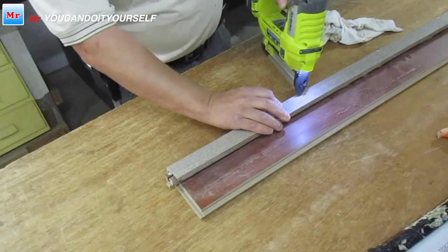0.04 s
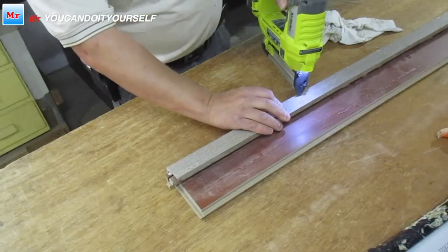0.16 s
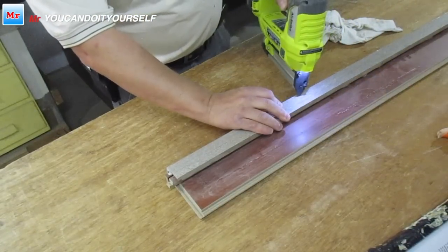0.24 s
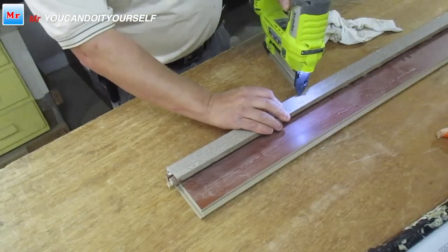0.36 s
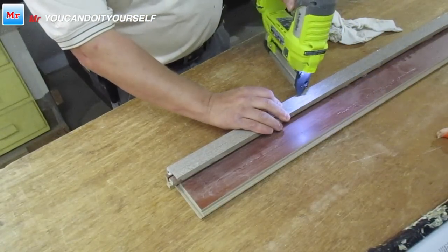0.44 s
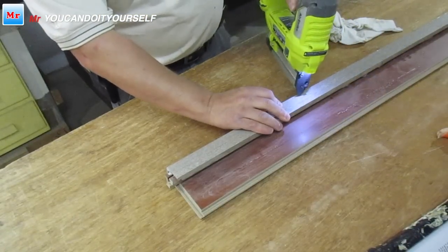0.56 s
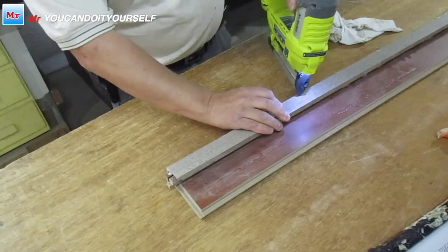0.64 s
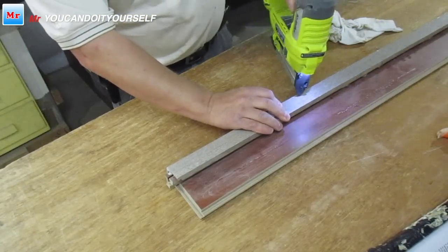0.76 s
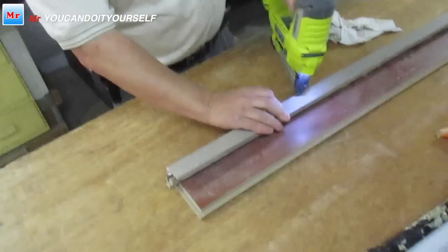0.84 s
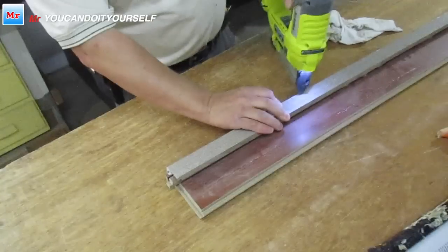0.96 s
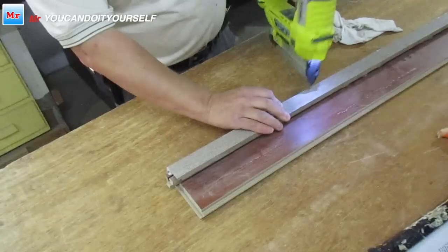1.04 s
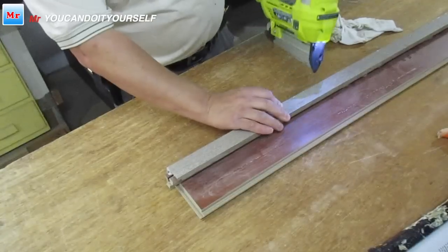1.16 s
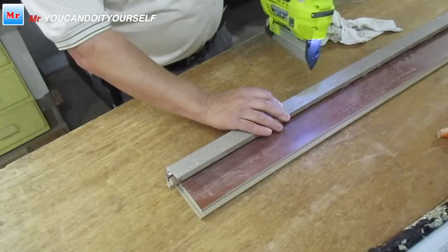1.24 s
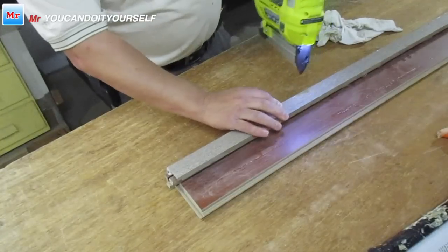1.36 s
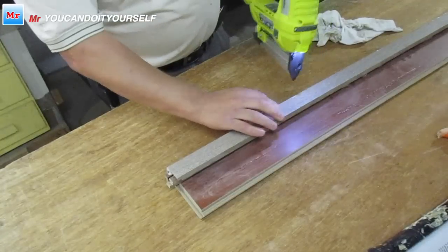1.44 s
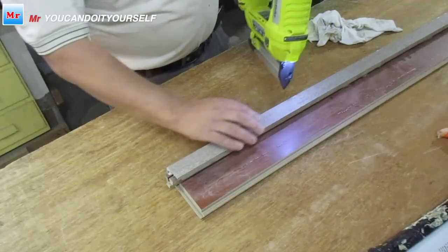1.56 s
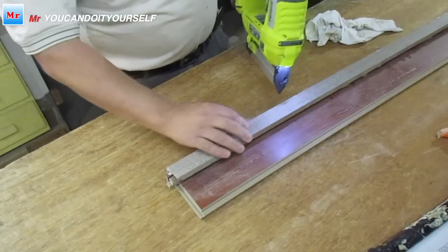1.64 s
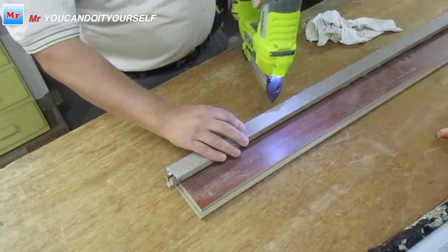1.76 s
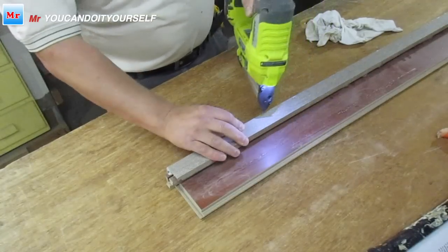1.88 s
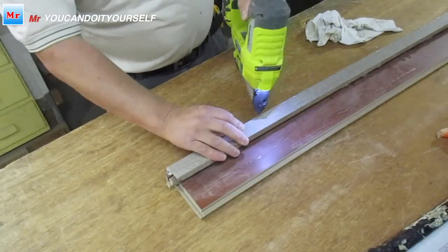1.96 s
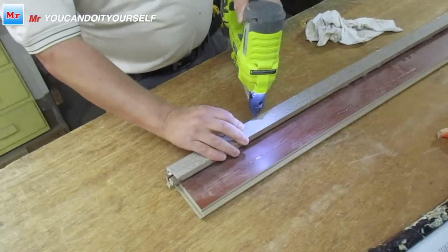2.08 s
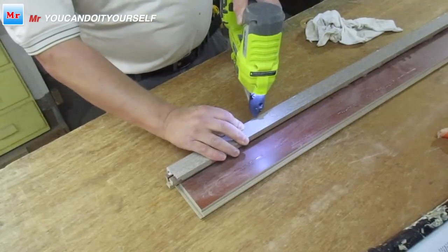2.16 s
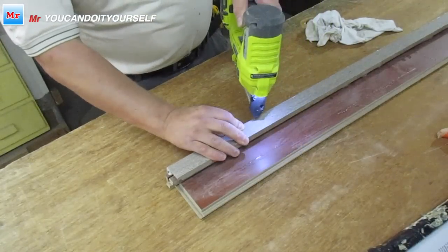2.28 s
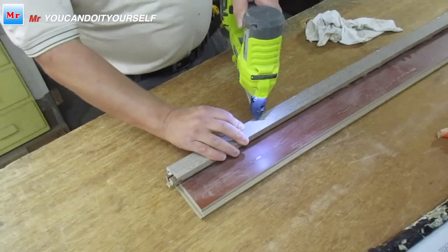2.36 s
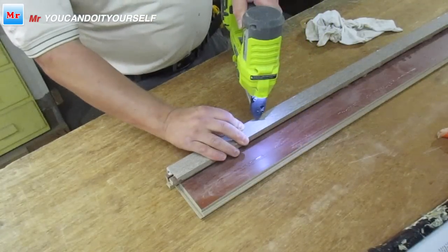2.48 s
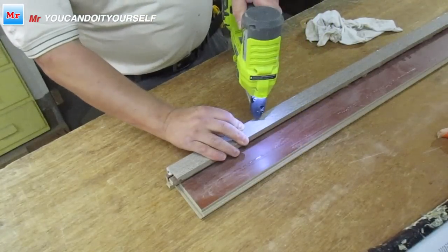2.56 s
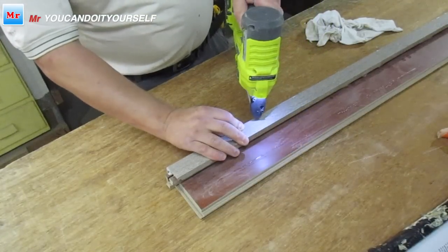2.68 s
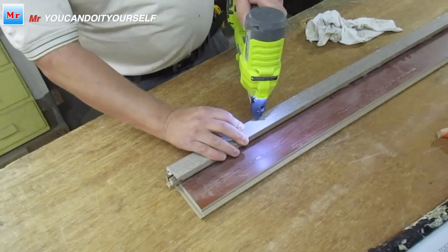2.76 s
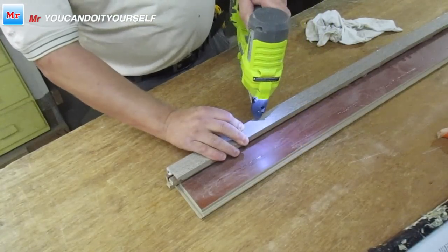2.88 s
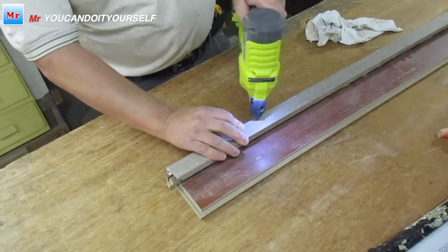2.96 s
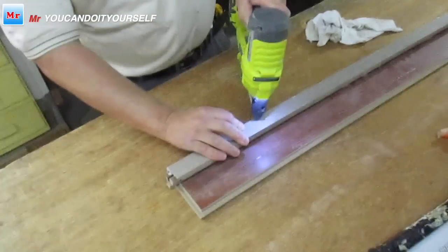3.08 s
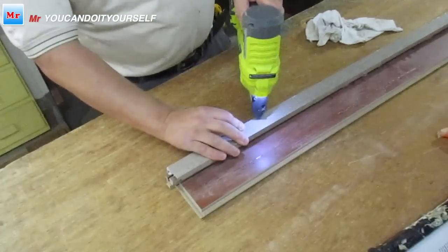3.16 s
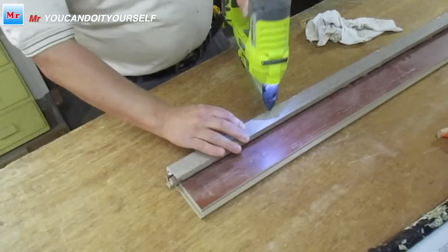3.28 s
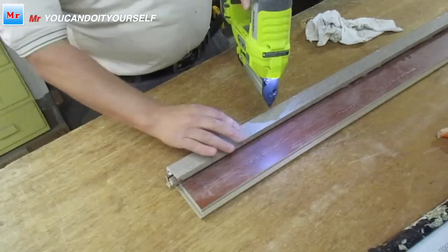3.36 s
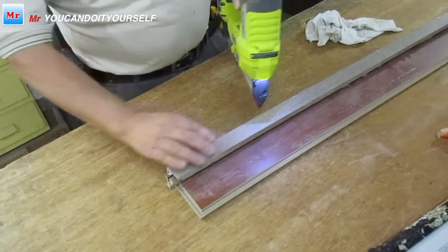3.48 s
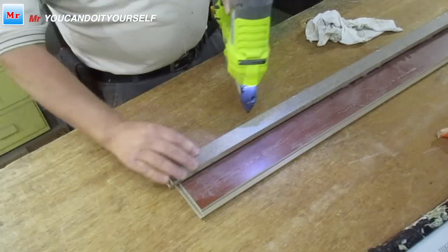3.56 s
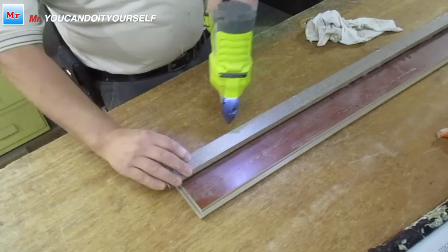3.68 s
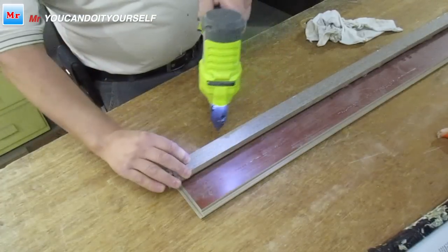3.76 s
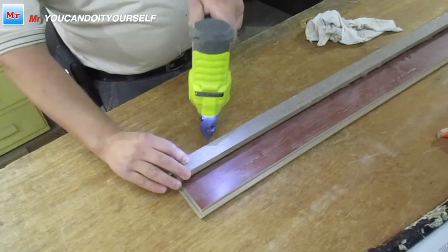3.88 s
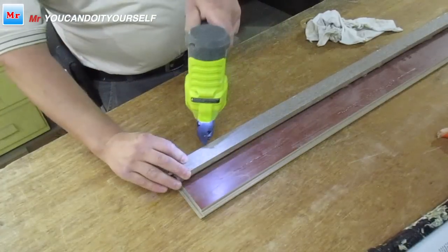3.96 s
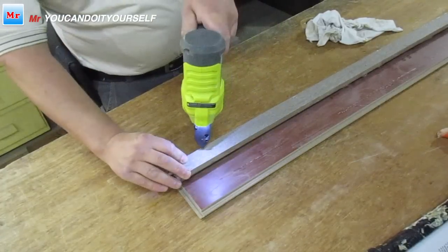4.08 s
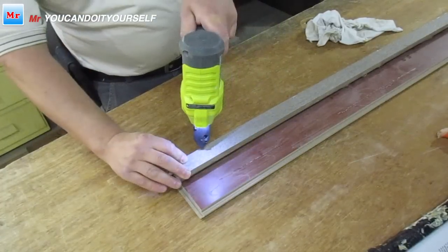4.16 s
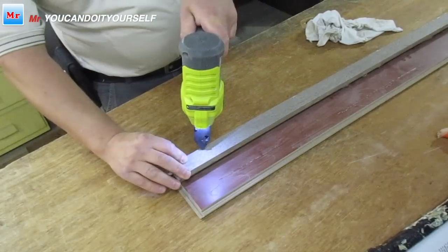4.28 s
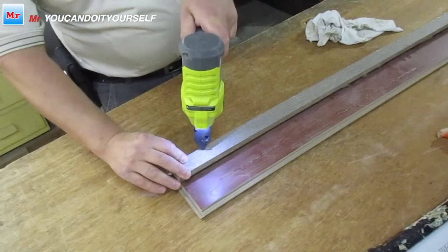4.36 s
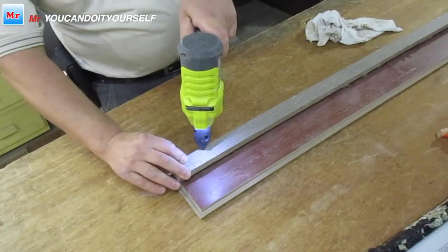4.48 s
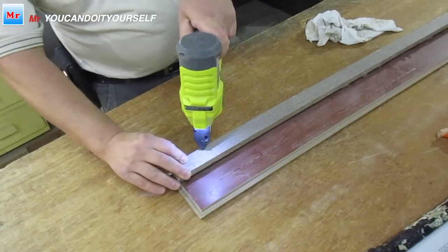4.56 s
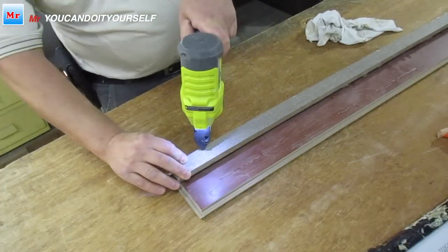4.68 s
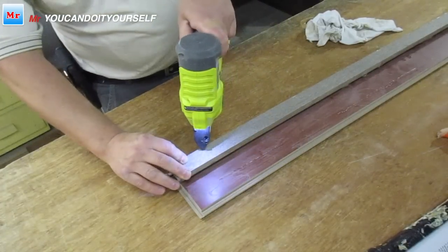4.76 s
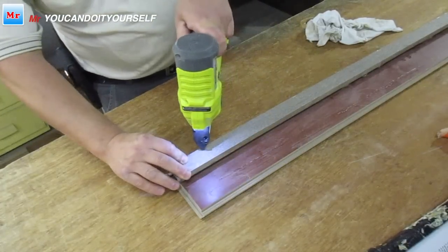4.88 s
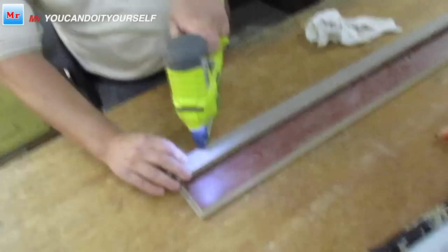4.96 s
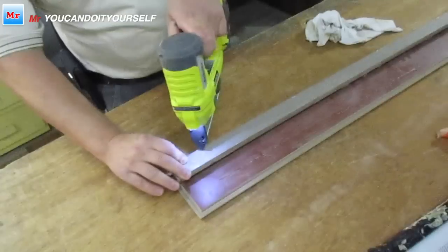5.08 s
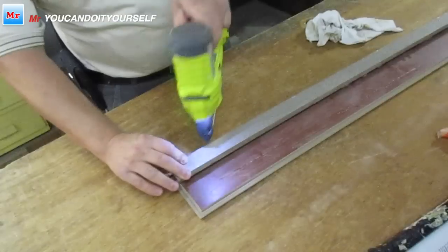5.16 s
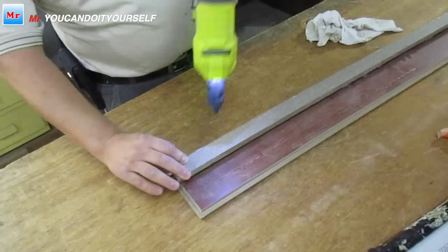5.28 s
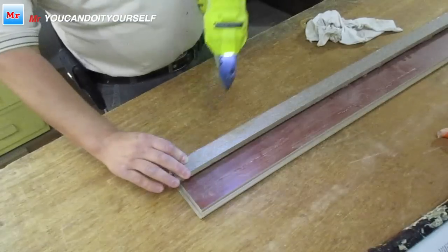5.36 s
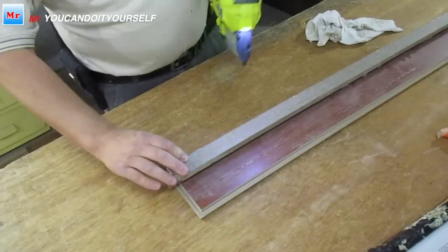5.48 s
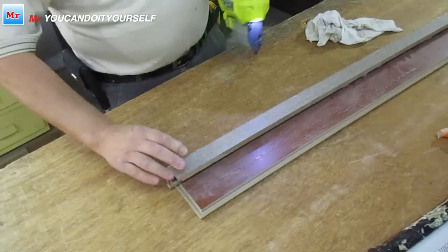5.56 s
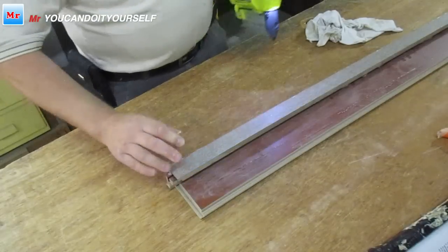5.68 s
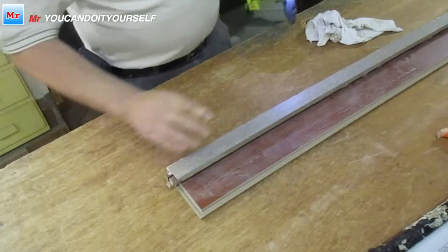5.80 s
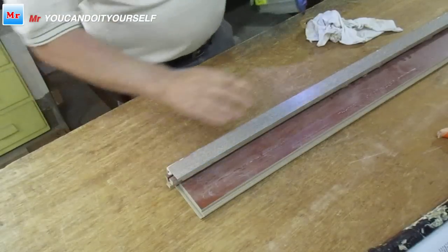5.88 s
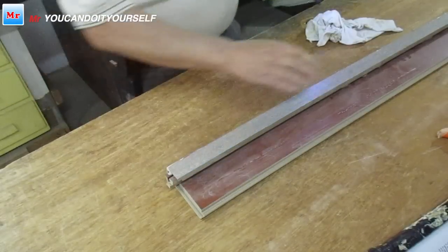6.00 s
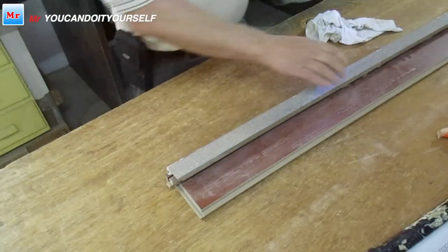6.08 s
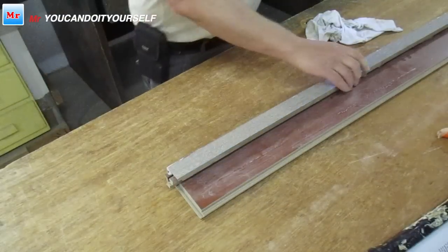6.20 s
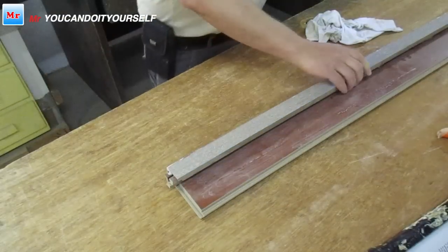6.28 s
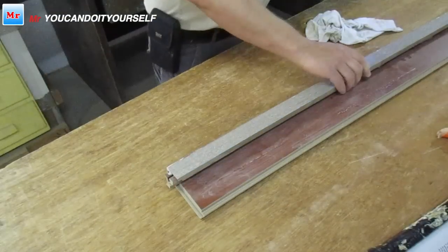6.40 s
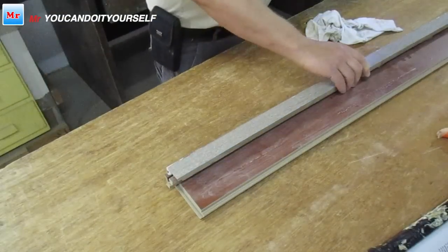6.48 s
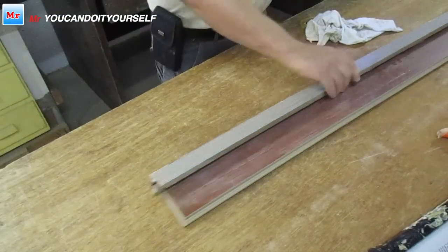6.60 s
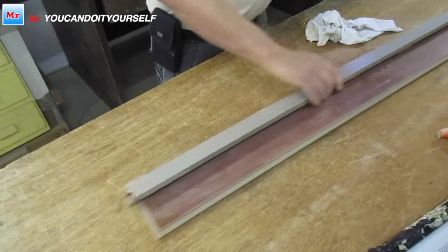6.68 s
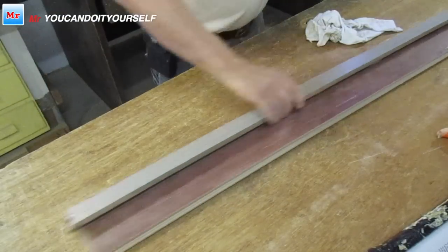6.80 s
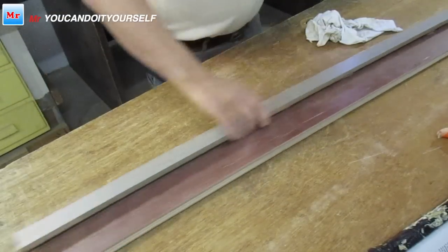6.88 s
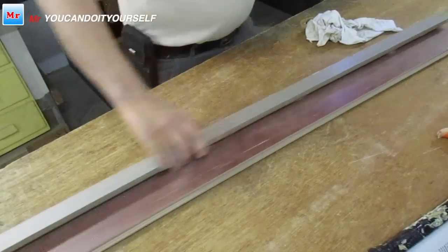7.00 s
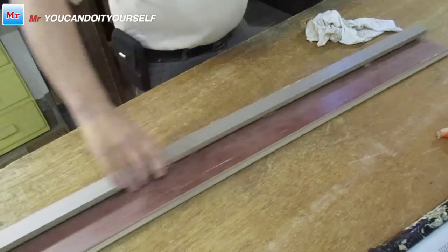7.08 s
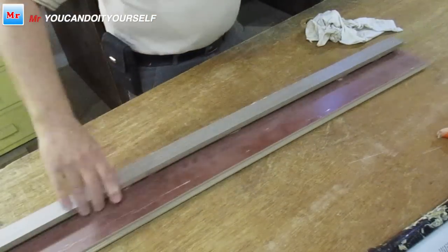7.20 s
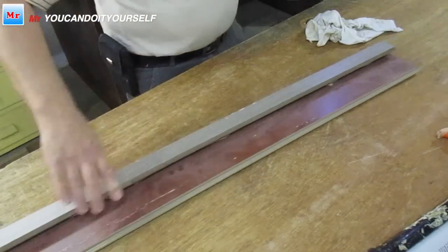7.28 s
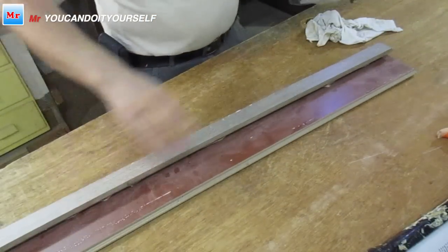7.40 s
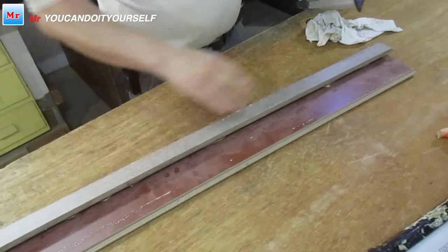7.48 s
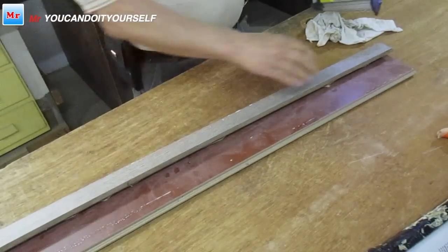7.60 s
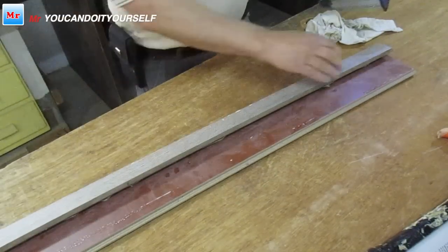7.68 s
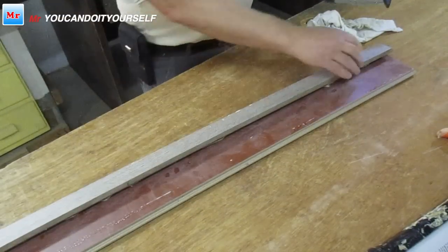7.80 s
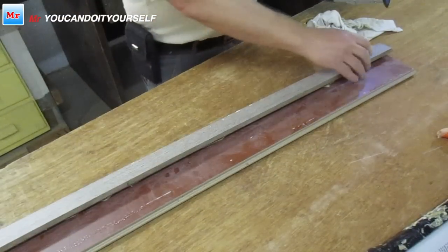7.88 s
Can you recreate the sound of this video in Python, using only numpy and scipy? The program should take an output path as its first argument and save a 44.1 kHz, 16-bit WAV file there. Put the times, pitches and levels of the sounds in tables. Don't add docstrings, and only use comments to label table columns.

```python
import sys
import numpy as np
from scipy import signal
from scipy.fft import rfft, irfft
from scipy.io import wavfile

SR = 44100
rng = np.random.default_rng(int(sys.argv[2]) if len(sys.argv) > 2 else 0)


def wrap_up_sound(samples):
    columns = np.atleast_2d(samples).T
    tamed = np.clip(columns, -1, 1)
    steps = np.round(tamed * 32767).astype(np.int16)
    wavfile.write(sys.argv[1], SR, steps)


def gain_from_decibels(decibels):
    exponent = np.asarray(decibels, float) / 20
    return 10 ** exponent


N = 350154
T = np.arange(N) / SR

# (time [s], thump [dB], pin home [dB], bumper [dB], hall [dB])
BLOWS = [
    (0.8542, -6, -5.5, -5, -12),
    (3.045, -6.5, -1, -9, -13),
    (5.021, -8, -1.5, -3.5, -11.5),
]


def unit(x):
    return x / np.sqrt(np.mean(x ** 2))


def colour(x, table):
    hz, db = np.transpose(table)
    f = np.arange(len(x) // 2 + 1) * SR / len(x) + 1
    gain = gain_from_decibels(np.interp(np.log(f), np.log(hz), db))
    return irfft(rfft(x) * gain, len(x))


def ring(x, hz, width):
    b, a = signal.iirpeak(min(hz, SR / 2.2), hz / width, fs=SR)
    return signal.lfilter(b, a, x)


def body(x, modes):
    out = 0
    for k, (hz, width, db) in enumerate(modes):
        once = ring(x, hz, 1.8 * width)
        out = out + (-1) ** k * gain_from_decibels(db) * ring(once, hz, 1.8 * width)
    return unit(out)


def glide(x, s, hz, width):
    phase = 2 * np.pi * np.cumsum(np.interp(T, s, hz)) / SR
    low_pass = signal.butter(2, width / 2, fs=SR, output="sos")
    slow = signal.sosfilt(low_pass, [x * np.cos(phase), x * np.sin(phase)])
    return unit(slow[0] * np.cos(phase) + slow[1] * np.sin(phase))


def grains(rate, spread_db):
    hit = rng.random(N) < rate / SR
    size_db = spread_db * np.minimum(rng.exponential(size=N), 3.5)
    return hit * rng.standard_normal(N) * gain_from_decibels(size_db)


def ping(db, hz, t60):
    t = T[:4096]
    return gain_from_decibels(db) * np.sin(2 * np.pi * hz * t) * 1000 ** (-t / t60)


def add(track, s, x):
    i = int(s * SR)
    track[i:i + len(x)] += x[:N - i]


def room_tone():
    # (frequency [Hz], density [dB per Hz])
    air_tone = [(15, -46), (25, -4.5), (86, -5.5), (140, -7), (252, -18), (358, -12), (409, -17),
                (565, -15), (646, -24), (719, -11.5), (1490, -16), (1610, -13.5), (2110, -22.5),
                (14200, -42), (15400, -47)]
    # (frequency [Hz], level [dB])
    fan_lines = [(134.6, -71), (721, -73.5), (1615, -73.5)]
    # (frequency [Hz], rms level [dB])
    scan_tone = [(15700, -88)]
    # (time [s], level [dB])
    gain_dips = [
        (0., -1.),
        (.86, -16),
        (3.05, -22),
        (5.03, -13),
        (7., -4),
    ]
    air_db, recovery_s = -53, 1.3
    air = unit(colour(rng.standard_normal(N), air_tone))
    air = air + 0.49 * ring(air, 8500, 3500)
    lines = sum(gain_from_decibels(db + 55.5) * unit(ring(rng.standard_normal(N), hz, 6.7)) for hz, db in fan_lines)
    scan = sum(gain_from_decibels(db + 63) * np.sin(2 * np.pi * hz * T) for hz, db in scan_tone)
    dip_db = sum(db * (T > s) * np.exp(-abs(T - s) / recovery_s) for s, db in gain_dips)
    return gain_from_decibels(air_db + dip_db) * (air + lines + scan)


def hall():
    # (frequency [Hz], t60 [s])
    reverb = [(40, 1.2), (100, 1.5), (160, 2.2), (420, 1.69), (1100, 1.56), (2900, 1.25), (5000, 0.98),
              (7700, 0.68), (11000, 0.48), (15000, .45)]
    # (frequency [Hz], t60 [s], level [dB])
    standing_waves = [(134.8, 2.61, -21), (165.7, 2.2, -23.5), (197.4, 2., -23.5)]
    t = T[:1 << 17]
    f_oct = np.log2(np.arange(len(t) // 2 + 1) * SR / len(t) + 1)
    hz, t60 = np.transpose(reverb)
    noise, echo = rfft(rng.standard_normal(len(t))), 0
    for c_oct in np.arange(4.5, 14.6, .5):
        decay_s = np.interp(c_oct, np.log2(hz), t60) / np.log(1000)
        band = irfft(noise * np.clip(1 - 2 * abs(f_oct - c_oct), 0, 1), len(t))
        echo = echo + band * np.exp(-t / decay_s) * np.sqrt(2 / decay_s / SR)
    for mode_hz, mode_t60, db in standing_waves:
        echo = echo + gain_from_decibels(db) / 100 * np.sin(2 * np.pi * mode_hz * t) * 1000 ** (-t / mode_t60)
    thicken = 1 - np.exp(-(t / 0.0045) ** 2)
    fade = np.clip(2 * (t[-1] - t), 0, 1) ** 2
    return echo * thicken * fade


def touch(s, length, db):
    edge_s, fade_db_s = .04, -20
    edges = np.clip(np.minimum(T - s, s + length - T) / edge_s, 0, 1)
    return gain_from_decibels(db + fade_db_s * abs(T - s)) * edges


def sliding():
    # (time [s], push [dB], bite of the edge [0-1])
    strokes = [(6.52, -71, .3), (6.6, -43.5, .1), (6.648, -34, .15), (6.72, -35.5, .44), (6.902, -40, .98),
               (6.944, -33.5, .85), (7.02, -28, .6), (7.05, -26.5, .15), (7.228, -30, .07),
               (7.34, -34.5, .15), (7.43, -38, -.25)]
    # (frequency [Hz], width [Hz], level [dB])
    board_modes = [(331, 89, -2.5), (490, 176, 0), (809, 160, 1.5), (1280, 460, -5.5)]
    # (frequency [Hz], width [Hz], level [dB])
    grit_modes = [(2257, 1400, 1.5), (3430, 1100, 3.5), (5030, 2000, -3.5), (6700, 3100, -8.5),
                  (11600, 3800, -17.5)]
    # (frequency [Hz], width [Hz], level [dB])
    thrum_modes = [(131.6, 96, -13), (211.4, 100, 5.5)]
    # (start [s], length [s], level [dB])
    skin_rubs = [
        (1.49, .29, -68),
        (4.68, .11, -73),
        (4.43, .06, -78),
        (7.62, .3, -71),
    ]
    # (start [s], length [s], level [dB])
    last_nudge = (7.66, .24, -61)
    skin_modes = [(4500, 1000, -2), (7400, 900, 1.5), (8900, 900, -5.5), (12600, 3200, -8.5)]

    s, push_db, bite = np.transpose(strokes)
    grit = grains(rate=5000, spread_db=1.5)
    edge = grains(rate=5000, spread_db=2.5)
    squeak_hz = np.minimum(9600 + 1800 * (s - s[0]), 10600)
    squeak = glide(edge, s, squeak_hz, width=710)
    squeak = squeak + gain_from_decibels(-10) * glide(edge, s, 1.335 * squeak_hz, width=600)

    db, bite = np.interp(T, s, push_db, -200, -200), np.interp(T, s, bite)
    grit_db = 1.4 * (db + 35) - 35 - 14 + 12 * bite
    thrum_db = np.minimum(db - 7, -44)
    slide = gain_from_decibels(db) * body(grit, board_modes)
    slide = slide + gain_from_decibels(grit_db) * body(grit, grit_modes)
    slide = slide + gain_from_decibels(thrum_db) * body(grit, thrum_modes)
    slide = slide + gain_from_decibels(db - 38 + 25 * bite) * squeak

    rub = body(grains(rate=6000, spread_db=3.5), skin_modes)
    rubbing = sum(touch(*row) for row in skin_rubs) * rub
    return slide + rubbing + touch(*last_nudge) * body(edge, grit_modes)


def tick(x, hz, treble_db):
    low_pass = signal.butter(2, 1.8 * hz, fs=SR, output="sos")
    dull = signal.sosfilt(low_pass, ring(x, hz, 1.3 * hz))
    return dull + gain_from_decibels(treble_db + 2.5) * ring(ring(x, 10500, 6000), 10500, 9000)


def handling():
    # (time [s], peak [dB], part)
    tick_events = [(0.0578, -36, "nose"), (0.3711, -39.5, "latch"), (0.629, -28, "grip"),
                   (0.6334, -30.5, "trigger"), (0.6454, -30.5, "spring"), (0.6719, -24.5, "switch"),
                   (0.677, -27, "contact"), (0.7068, -9.5, "clutch"), (0.9497, -16, "return"),
                   (2.4139, -35.5, "nose"), (2.7207, -31.5, "grip"), (2.814, -38, "trigger"),
                   (2.8254, -42, "spring"), (2.8617, -31, "switch"), (2.8654, -26, "contact"),
                   (2.8958, -23.5, "clutch"), (3.0674, -17, "edge"), (3.1444, -16, "return"),
                   (4.3086, -52, "nose"), (4.569, -46, "edge"), (4.787, -33, "trigger"),
                   (4.8034, -42, "spring"), (4.8374, -35, "switch"), (4.8414, -31.5, "contact"),
                   (4.8718, -27, "clutch"), (5.1194, -14, "return"), (6.9583, -26.5, "edge"),
                   (7.0304, -29, "edge")]
    part_sounds = {"nose": (2300, .003, -9, -32), "grip": (2150, .0045, 0.5, -26),
                   "latch": (5400, .0032, -6.5, -17.5), "trigger": (2600, .003, 0.5, -17),
                   "spring": (2800, .003, -4, -13), "switch": (2400, .0055, 2.5, -12),
                   "contact": (2200, .002, -2, -11), "clutch": (5600, .0014, -6, -18),
                   "return": (3100, .002, -6, -14), "edge": (2250, .002, -6, -20)}
    # (level against the tick [dB], frequency [Hz], t60 [s])
    clutch_ring = (-6, 5700, .025)
    # (time [s], level [dB], frequency [Hz], t60 [s])
    metal_pings = [
        (0.281, -45, 1146, 0.21),
        (0.8127, -10.5, 5740, .03),
        (.838, -15, 492.3, 0.031),
        (4.44, -66, 4900, 0.089),
        (4.872, -34, 8300, .03),
    ]
    # (time [s], level [dB], frequency [Hz])
    spring_twangs = [
        (.646, -42, 10300),
        (.675, -36, 10300),
        (2.826, -58, 13900),
        (2.873, -46, 13800),
        (4.805, -63, 10400),
        (4.841, -48, 10400),
    ]
    # (time [s], level [dB], hall [dB])
    bench_knocks = [
        (.002, -33, -36.5),
        (.055, -31, -47),
        (2.414, -24.5, -30.5),
        (4.309, -32, -36.5),
        (.836, -24, -32.5),
        (7.39, -55, -44.5),
    ]
    # (frequency [Hz], t60 [s], level [dB])
    bench_modes = [(130, 0.029, 2.5), (230, 0.055, 0.5), (392, 0.12, -11), (800, 0.027, -5),
                   (1250, .03, -12)]
    # (frequency [Hz], density [dB per Hz])
    knock_tone = [(18, -41.5), (30, -12), (64, -5), (138, -3.5), (169, -9), (197, -10), (393, -12.5),
                  (439, -9.5), (654, -17.5), (6000, -51.5), (7800, -84.5), (13200, -120)]
    # (frequency [Hz], density [dB per Hz])
    shelf_tone = [(180, -39.5), (300, 2), (697, -5), (783, -17), (850, 2), (2330, -2), (2570, -3),
                  (4020, -5.5), (10500, -11), (15600, -27)]
    twang_t60_s = .042
    shelf_s, shelf_decay_s, shelf_db, shelf_hall_db = 6.1093, .0022, -29.5, -5.5

    near, far, dull, t = np.zeros(N), np.zeros(N), np.zeros(N), T[:4096]
    for s, db, part in tick_events:
        hz, decay_s, hall_db, treble_db = part_sounds[part]
        if part == "clutch":
            add(near, s, gain_from_decibels(db) * ping(*clutch_ring))
        noise = tick(rng.standard_normal(len(t)), hz, treble_db)
        click = tick(1. * (t == 0), hz, treble_db)
        add(near, s, gain_from_decibels(db - 7.5) * unit(noise) * np.exp(-t / max(decay_s, 3e-4)))
        add(far, s, gain_from_decibels(db + hall_db + 23) * click)

    shelf = unit(colour(rng.standard_normal(len(t)), shelf_tone))
    add(near, shelf_s, gain_from_decibels(shelf_db) * shelf * np.exp(-t / shelf_decay_s))
    impulse = 1. * (np.arange(len(t)) == 128)
    add(far, shelf_s, gain_from_decibels(shelf_hall_db) * colour(impulse, shelf_tone))

    for s, db, hz, t60 in metal_pings:
        add(near, s, ping(db, hz, t60))
    for s, db, hz in spring_twangs:
        add(near, s, ping(db, hz, twang_t60_s))

    for s, db, hall_db in bench_knocks:
        size = gain_from_decibels(2.1 * rng.standard_normal(len(bench_modes)))
        x = sum(g * ping(mode_db, hz, t60) for g, (hz, t60, mode_db) in zip(size, bench_modes))
        add(near, s, -gain_from_decibels(db) * x * (1 - np.exp(-t / .002)))
        add(dull, s + 0.0026, gain_from_decibels(np.array([hall_db + 53])))
    return near, far + colour(dull, knock_tone)


def motor():
    # (start [s], full-load level [dB], rise [dB], brush [dB], gear whine [dB])
    windups = [
        (0.705, -19.5, 12, -26.5, -19.5),
        (2.894, -22, 16, -32.5, -25),
        (4.87, -27, 15, -32, -30),
    ]
    # (frequency [Hz], width [Hz], level [dB])
    housing_modes = [(1100, 310, -6.5), (1800, 680, 2.5), (2790, 2600, -0.5), (4400, 3400, 0.5),
                     (6700, 2600, -3.5)]
    # (frequency [Hz], width [Hz], level [dB])
    gear_modes = [(5830, 53, 5.5), (5530, 230, -1), (6060, 200, 0)]
    # (frequency [Hz], width [Hz], level [dB])
    brush_modes = [(8300, 900, 7.5), (10300, 3000, -11), (12800, 1400, -1), (14500, 1600, -10.5)]
    # (time before the shot [s], armature [Hz], gear [Hz])
    speed = [
        (0.11, 2400, 5600),
        (.09, 2950, 5700),
        (0.082, 2950, 5850),
        (.03, 2650, 5600),
        (0.0023, 2050, 6100),
    ]
    gear_sings_s = .072, .03
    load_curve, brush_curve = 1.5, 1.9
    brush_rise_db, whine_rise = 20, .6
    rumble_db, rumble_rise = -8, .55
    whine_fall_db, fall_before_db_s, fall_after_db_s = -16, 500, 450
    run_on_s, surge_s, surge_rattle_db, surge_rumble_db = .008, .012, 2.5, 10.5

    before, armature_hz, gear_hz = np.transpose(speed)
    s = np.concatenate([blow[0] - before for blow in BLOWS])
    armature_hz, gear_hz = np.tile(armature_hz, len(BLOWS)), np.tile(gear_hz, len(BLOWS))
    teeth, mesh = grains(rate=9000, spread_db=-1.5), grains(rate=8000, spread_db=1.0)
    whine = glide(mesh, s, gear_hz, width=330) + gain_from_decibels(-6) * body(mesh, gear_modes)
    rumble = body(mesh, [(146, 79, 4), (310, 230, 4), (575.5, 850, 0)])
    rattle = body(teeth, housing_modes) + gain_from_decibels(-7) * glide(mesh, s, armature_hz, width=410)
    brushes, out = body(teeth, brush_modes), 0

    for (start, db, rise_db, brush_db, whine_db), (end, *_) in zip(windups, BLOWS):
        left = np.clip((end - T) / (end - start), 0, 1)
        slack_db = -rise_db * left ** load_curve
        surge = np.clip(1 - (end - T - run_on_s) / surge_s, 0, 1)
        early_db = fall_before_db_s * (end - T - gear_sings_s[0])
        late_db = fall_after_db_s * (T - end + gear_sings_s[1])
        off_db = np.maximum(-np.maximum(early_db, late_db).clip(0), whine_fall_db)
        run = gain_from_decibels(db + slack_db + surge_rattle_db * surge) * rattle
        run = run + gain_from_decibels(whine_db + off_db + whine_rise * slack_db) * whine
        run = run + gain_from_decibels(brush_db - brush_rise_db * left ** brush_curve) * brushes
        run = run + gain_from_decibels(db + rumble_db + rumble_rise * slack_db + surge_rumble_db * surge) * rumble
        out = out + (T > start) * (T < end) * run
    return out


def shots():
    # (delay [s], decay [s], brightness [0-1])
    crack_steps = [
        (0, .0018, 0),
        (.0029, .0014, .55),
        (.0047, .0013, .1),
    ]
    # (frequency [Hz], density [dB per Hz])
    crack_tone = [(290, -21.5), (500, 4.5), (1270, -10.5), (2110, 2.5), (2850, -11), (4520, -8),
                  (5780, -12), (8520, -11), (15600, -28)]
    # (frequency [Hz], density [dB per Hz])
    hall_tone = [(18, -59), (30, -21), (97, -10.5), (133, -2), (173, 0), (231, -10), (380, -4), (433, -9),
                 (548, 0), (1200, -11), (1330, -8), (2920, -17.5), (4680, -21), (6930, -21.5),
                 (15600, -51.5)]
    # (delay [s], level [dB], frequency [Hz], t60 [s])
    rebound = (.023, -20, 6500, .01)
    thump_hz, thump_decay_s, release_db = 160, .0055, 0.2

    out, t = np.zeros(N), T[:2048]
    swell = np.clip(t / 0.00013, 0, 1) * np.exp(-abs(t / thump_decay_s - .6) ** 2)
    thump = np.sin(2 * np.pi * thump_hz * t + .5) * swell
    for s, thump_db, *crack_db, hall_db in BLOWS:
        noise = unit(colour(rng.standard_normal(len(t)), crack_tone))
        add(out, s, gain_from_decibels(thump_db) * thump)
        add(out, s + rebound[0], ping(*rebound[1:]))
        for (delay_s, decay_s, bright), db in zip(crack_steps, [thump_db + release_db] + crack_db):
            crack = unit(ring(noise - bright * np.roll(noise, 1), 5000, 14000))
            if bright:
                crack = crack[::-1]
            add(out, s + delay_s, gain_from_decibels(db) * np.exp(-t / decay_s) * crack)
        tail = colour(np.roll(hall(), 128), hall_tone)
        tail = tail + 0.96 * ring(tail, 4700, 320) + 1.2 * ring(tail, 12500, 4000)
        add(out, s, gain_from_decibels(hall_db + 47.5) * tail)
    return out


def scene():
    wind, slide = motor(), sliding()
    taps, taps_far = handling()
    sent = taps_far + gain_from_decibels(-12) * wind + gain_from_decibels(-4) * slide
    echo = signal.fftconvolve(sent, hall())[:N]
    near = shots() + taps + gain_from_decibels(-1.0) * wind + gain_from_decibels(-2.5) * slide
    return (near + echo + room_tone())[None]


def band_limit(x):
    return signal.sosfilt(signal.butter(12, 15750, fs=SR, output="sos"), x)


def record(dry):
    duck_db, wait_s, attack_s, recovery_s = -5, .008, 0.0044, .12
    gain_db = 0
    for s, *_ in BLOWS:
        after = T - s - wait_s
        gain_db = gain_db + duck_db * np.clip(after / attack_s, 0, 1) * np.exp(-abs(after) / recovery_s)
    x = dry - .65 * ring(dry, 7900, 300)
    return band_limit(np.clip(x * gain_from_decibels(gain_db), -1, 1))


dry = scene()
out = record(dry)
wrap_up_sound(out)
```